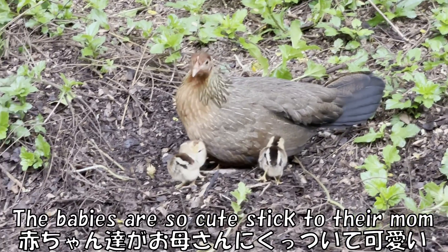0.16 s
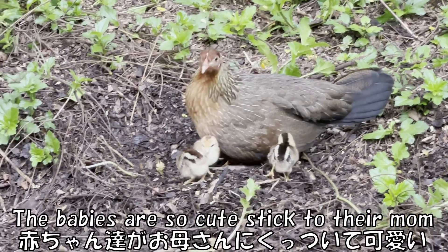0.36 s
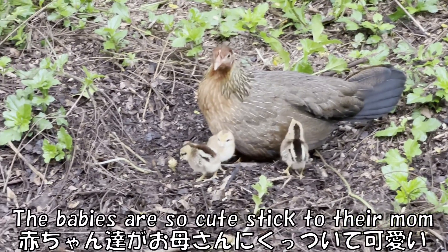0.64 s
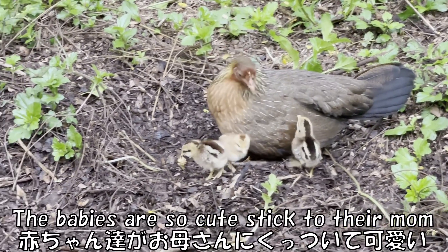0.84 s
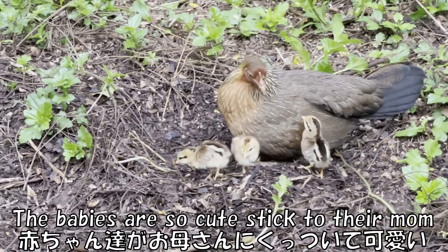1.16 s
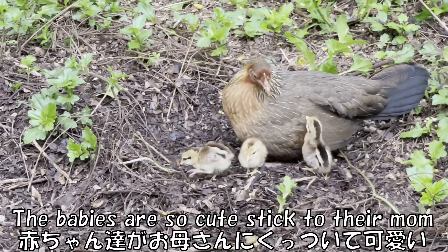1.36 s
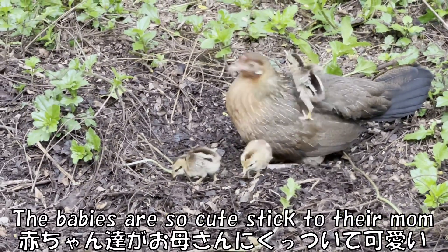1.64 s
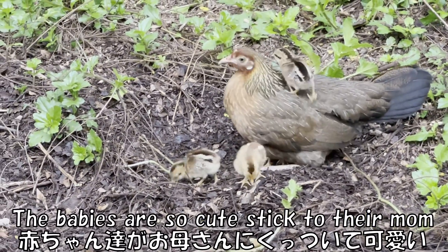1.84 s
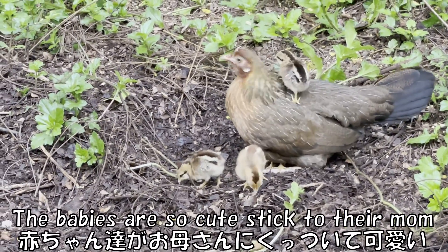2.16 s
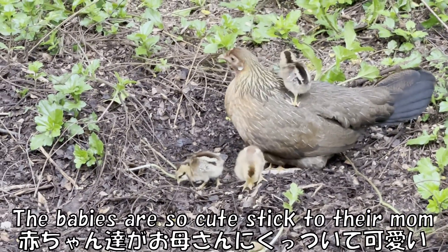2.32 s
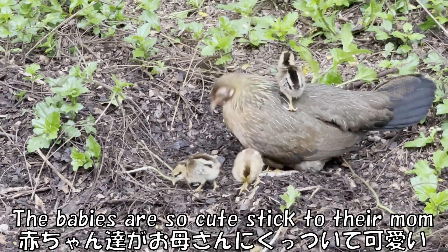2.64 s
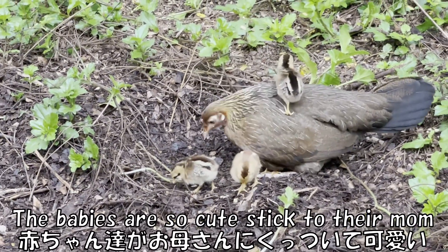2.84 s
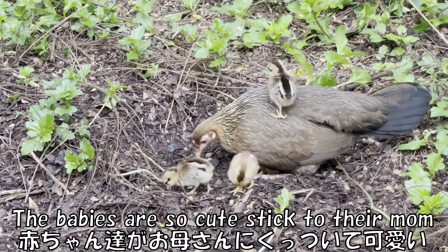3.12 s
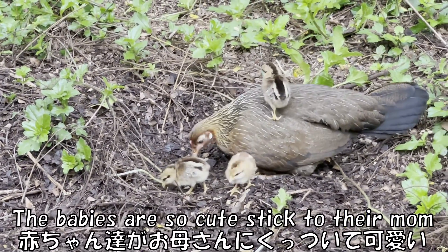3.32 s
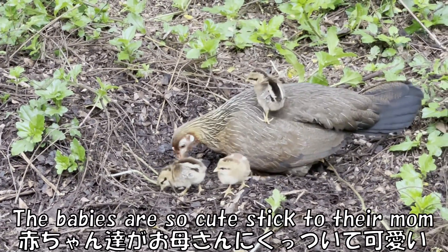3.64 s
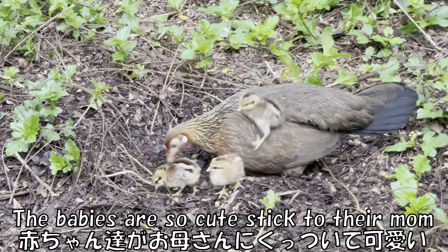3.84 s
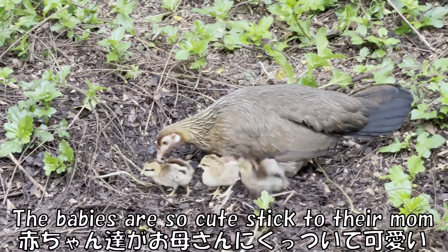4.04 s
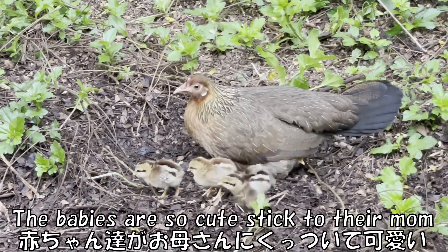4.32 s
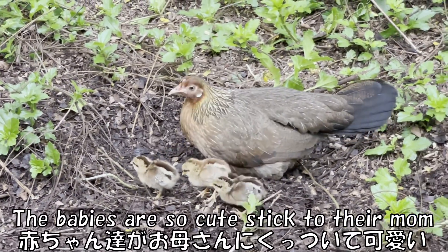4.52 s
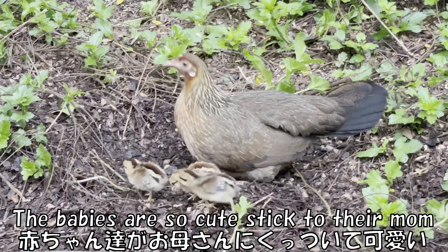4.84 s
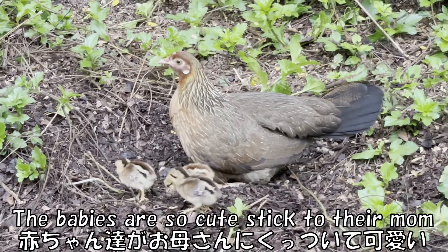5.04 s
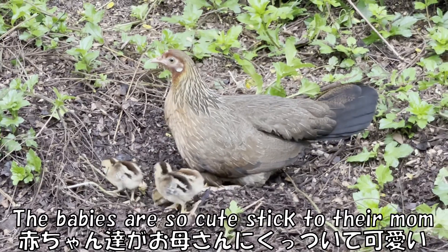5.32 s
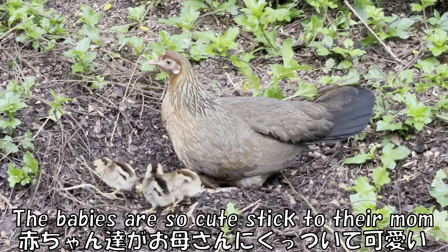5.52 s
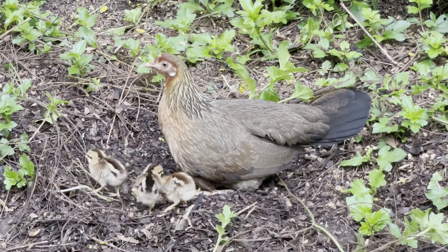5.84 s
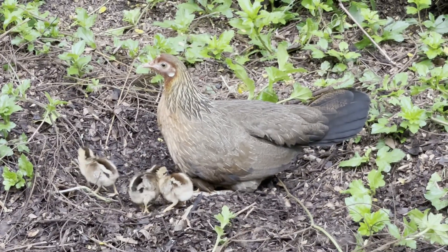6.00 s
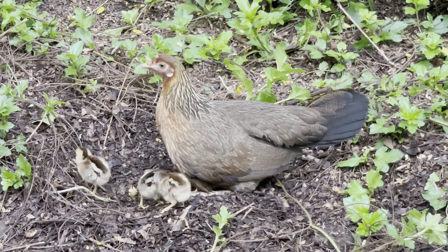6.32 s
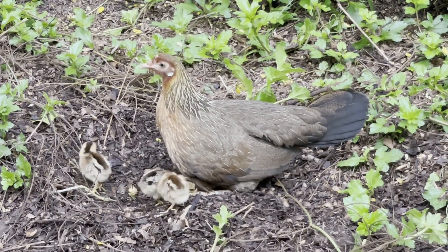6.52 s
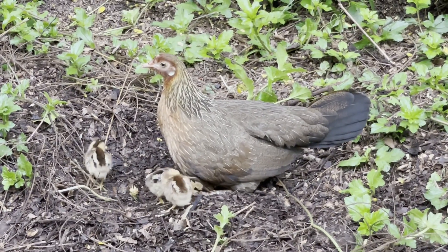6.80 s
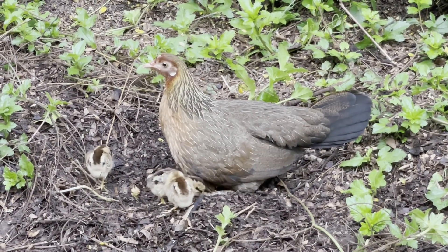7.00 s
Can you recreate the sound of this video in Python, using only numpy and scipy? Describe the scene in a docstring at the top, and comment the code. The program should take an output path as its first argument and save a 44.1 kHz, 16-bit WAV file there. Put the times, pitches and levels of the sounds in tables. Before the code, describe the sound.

For about seven seconds, a wide bed of distant traffic rumble, soft tyre wash, faint machine hum and thin hiss continues, with bass engine drones swelling most around 3.3 and 4.3-5.2 seconds. High, quiet crickets trill and buzz throughout; one stutters rapidly until about 3.8, while another gives brief chirps from 3 onward. Thin, nearly pure chick peeps start at once, cluster at 0.4-2.0, pause, then return at 3.0-5.3 and 6.1-7.0. At 0.6-1.1 a clearer songbird whistles four low, fluty notes, the last sliding down with a rough edge, followed by wall echo and leafy reverberation. Small scuffs and steps rustle dry litter at 1.8-2.2. Far hoarse bird chips fall at 2.4-2.8, then more strongly at 6.3-6.8, beside tiny twig ticks at 6.3 and 6.5.

```python
"""Chicks in a green city corner

Chicks peep as gliding near-pure tones and scuff dry litter in decaying bursts of grainy noise.
A wild bird whistles one phrase that a wall throws back; another calls from far off by way of the trees.
Crickets trill, buzz, stutter and chirp in the weeds: tones and narrow noise pulsed by wing beats.
Behind them lie far engines as wandering bass tones, and rumble, wash, hum, whine and hiss as shaped noise.
"""
import sys
import numpy as np
from scipy import signal
from scipy.fft import rfft, irfft
from scipy.io import wavfile
from scipy.ndimage import uniform_filter1d

SR = 44100
rng = np.random.default_rng(int(sys.argv[2]) if len(sys.argv) > 2 else 0)


def to_wav(s):
    """Save 16-bit WAV."""
    ch = np.atleast_2d(s).T  # columns
    pcm = np.round(np.clip(ch, -1, 1) * 32767)  # PCM
    wavfile.write(sys.argv[1], SR, pcm.astype(np.int16))


N = 315756
TIME = np.arange(N) / SR
BINS_HZ = np.maximum(np.arange(N // 2 + 1) * SR / N, 1)
TOP_HZ = 15700

# Spectrum of the traffic rumble. Each row: frequency in Hz, relative density in dB per Hz.
RUMBLE_SPECTRUM = [(20, -13), (32, -14), (41, -30), (50, -5), (66, 0), (88, 2.5), (108, -4.5), (135, -8.5),
                   (170, -9), (215, -17), (245, -21.5)]
# Spectrum of the wider city wash. Each row: frequency in Hz, relative density in dB per Hz.
WASH_SPECTRUM = [(140, -61), (240, -1), (412, -2.5), (489, -1), (612, -7.5), (645, -8), (698, -10.5),
                 (765, -9.5), (1520, -18), (1830, -14), (2260, -21), (3010, -25.5), (3980, -30.5),
                 (4780, -33.5), (5600, -35.5), (7280, -88), (12300, -120)]
# Spectrum of the thin hiss of the air. Each row: frequency in Hz, relative density in dB per Hz.
AIR_SPECTRUM = [(4800, -12), (5700, 7), (7400, 12.5), (8600, -73), (10300, 4.5), (11200, 6), (12400, 7),
                (13500, 1), (15500, -4)]
# Stereo width of the background. Each row: frequency in Hz, side minus mid in dB.
STEREO_WIDTH = [(40, -19), (85, -19), (160, -7.5), (280, -10), (490, -3), (700, 0.5), (1100, 0),
                (1800, -15.5), (4000, -7), (8000, -10), (12000, -13)]
# Hum of far machinery. Each row: frequency in Hz, level in dB.
HUM_BANDS = [(188, -53.5), (220, -58), (281, -61), (493, -58.5), (659, -62.5)]
# Faint thin whine high in the air. Each row: frequency in Hz, level in dB.
WHINE_BANDS = [(7584, -85), (9930, -81), (11810, -86)]
# Course of the heavy far engine. Each row: time in seconds, level in dB before heavy_db and the sway.
HEAVY_ENGINE_LEVEL = [(0, -42), (0.9, -56), (1.35, -49), (1.75, -49), (2.85, -63), (3.25, -38), (3.6, -49),
                      (4.3, -34), (4.75, -41), (5.15, -35.5), (5.65, -51), (6.7, -53), (7.05, -42)]

# Tones of the steady trill. Each row: wing beats away from the tooth tone, peak level in dB before the gain.
TRILL_TONES = [(-2, -86), (-1, -71), (0, -73), (1, -73), (2, -85)]
TRILL_HZ, TRILL_BEAT_HZ = 8023, 56

# Buzzing cricket: pace of its pushes; ring level in a push and between pushes
PUSH_ENDS_S, PUSH_EVERY_S, PUSH_LENGTH_S, PUSH_SWELL_S, PUSH_RELEASE_S = 0.542, 1.143, 0.63, 0.42, 0.043
PUSH_RING_DB, REST_RING_DB = -64, -76.5

# Stuttering cricket: one bout of even bursts
STUTTER_FROM_S, STUTTER_UNTIL_S, STUTTER_EVERY_S, STUTTER_LENGTH_S = 0.073, 3.76, .1625, 0.14
# Level at the bout's edges, mid-bout swell, random spread of level and timing
STUTTER_DB, STUTTER_SWELL_DB, STUTTER_SPREAD_DB, STUTTER_JITTER_S = -70, 4.5, 0.1, 0.011
# Short chirps of a second cricket. Each row: start in seconds, level in dB.
CHIRP_EVENTS = [(3.035, -64), (3.525, -65), (4.21, -65), (4.71, -66), (5.158, -61), (5.68, -63.5),
                (6.268, -63), (6.962, -61)]
CHIRP_LENGTH_S = 0.044

# Calls of the far bird. Each row: start in seconds, length in seconds, start pitch in Hz, end pitch in Hz,
# arch above a straight glide in Hz, level in dB before the direct and scattered gains.
FAR_BIRD_CALLS = [(2.385, .128, 3560, 2940, 151, -67), (2.515, 0.05, 2980, 2490, -20, -60),
                  (2.755, .084, 2930, 2380, -41, -62), (6.337, .035, 3040, 2420, -40, -57),
                  (6.493, 0.04, 3070, 2420, -140, -52), (6.74, .036, 3100, 2370, -130, -52.5)]

# Notes of the whistled phrase. Each row: start in seconds, length in seconds, attack in seconds, top in Hz,
# end in Hz, scoop up from below in Hz, direct level in dB before the shake.
WHISTLE_NOTES = [(.626, .054, 0.022, 1810, 1628, 0, -42.5), (.778, 0.05, 0.014, 1769, 1720, 2, -38),
                 (.866, .088, 0.018, 1708, 1215, 3, -42.5), (1.022, 0.11, 0.0088, 1610, 1458, 904, -43.5)]
# Overtones of the whistle. Each row: multiple of the pitch, level in dB before slide, edge and fizz gains.
WHISTLE_OVERTONES = [(4, -41), (5, -31), (6, -42), (7, -38), (8, -26.5), (9, -37), (10, -41)]
WHISTLE_RELEASE_S, SCOOP_TAU_S = .015, .008
# A soft tone links the notes and breaks off before the last one
LINK_FADE_S, LINK_DB, BREAK_S = 0.045, -53.5, .05

# Scuffs, steps and twig ticks of small feet and wings. Each row: start in seconds, decay in seconds,
# centre in Hz, nominal width in Hz, level in dB before the envelope.
LITTER_SCUFFS = [(1.812, 0.053, 7800, 4200, -52), (1.936, 0.11, 2300, 1900, -53),
                 (1.978, 0.022, 1500, 1300, -47), (2.217, 0.011, 990, 990, -39),
                 (5.915, .015, 8000, 9000, -66), (6.304, 0.0056, 3500, 450, -43),
                 (6.468, .006, 4150, 600, -48)]

# Chick peeps. Each row: start in seconds, length in seconds, start pitch in Hz, end pitch in Hz,
# arch above a straight glide in Hz, direct level in dB.
CHICK_PEEPS = [(.065, 0.1, 4850, 3720, 20, -64.5), (.44, 0.091, 4700, 3750, -88, -63),
               (.605, 0.022, 3800, 3340, 50, -61.5), (.65, .054, 3950, 3450, 70, -63),
               (.72, 0.077, 4400, 3800, 370, -64), (1.1, .065, 4060, 3550, 12, -57.5),
               (1.215, .045, 3250, 3880, -90, -63), (1.26, 0.054, 4310, 3580, 160, -57.5),
               (1.392, .038, 3070, 3960, -90, -63), (1.62, 0.032, 3100, 4030, -280, -59),
               (1.675, .075, 4080, 3620, 140, -55.5), (1.895, 0.078, 4300, 3780, 142, -60),
               (2.965, .05, 3850, 3300, 40, -67), (3.11, 0.04, 4170, 3600, 120, -66),
               (3.6, 0.043, 3780, 3640, 0, -60.5), (3.63, .071, 4400, 3630, 170, -67),
               (3.732, .044, 4200, 3620, 80, -57.5), (3.805, 0.085, 4420, 3900, 300, -65),
               (4.14, .047, 4150, 3460, 0, -56.5), (4.205, .075, 4580, 3700, 80, -61.5),
               (4.29, .05, 4200, 3630, 100, -56.5), (4.642, 0.052, 4080, 3630, 62, -59),
               (4.828, .057, 4180, 3680, 100, -61), (5.25, .03, 3850, 3480, 20, -61),
               (5.26, 0.05, 4080, 3650, 60, -66), (6.088, 0.061, 3830, 3480, 190, -61.5),
               (6.265, .046, 4150, 4020, 210, -66), (6.665, .075, 4700, 4100, 130, -65),
               (6.975, .084, 4750, 3800, 240, -63.5)]


def undb(db):
    """Decibels to gain."""
    return 10 ** (np.asarray(db) / 20)


def unit(x):
    """Scale to an rms of one."""
    return x / np.sqrt(np.mean(x ** 2) + 1e-20)


def colour(points):
    """Gain at every frequency from (Hz, dB) points, falling steeply outside them."""
    hz, db = np.transpose(points)
    outside = np.minimum(BINS_HZ / hz[0], 1) * np.minimum(hz[-1] / BINS_HZ, 1)
    return undb(np.interp(np.log(BINS_HZ), np.log(hz), db)) * outside ** 10


def noise(gain):
    """Unit-rms noise with the given gain at every frequency."""
    return unit(irfft(rfft(rng.standard_normal(N)) * gain, N))


def band(hz, width_hz):
    """Unit-rms noise in one steep resonance, 4.5 dB down at 0.8 width_hz to either side."""
    return noise(1 / (1 + ((BINS_HZ - hz) / (.8 * width_hz)) ** 4) ** .75)


def walk(rate_hz):
    """Smooth random wander of unit rms; its spectrum decays exponentially over rate_hz."""
    return noise(np.exp(-np.arange(len(BINS_HZ)) * SR / N / rate_hz))


def diffuse(gain):
    """Noise from all around: mid and side noise, with the side share set by frequency."""
    hz, side_db = np.transpose(STEREO_WIDTH)
    width = undb(np.interp(np.log(BINS_HZ), np.log(hz), side_db))
    share = np.sqrt(np.sum((gain * width) ** 2) / np.sum(gain ** 2))
    return noise(gain) + np.array([[1], [-1]]) * share * noise(gain * width)


def add(out, start_s, sound):
    """Mix a sound in at its start time."""
    i = max(int(start_s * SR), 0)
    out[i:i + len(sound)] += sound[:max(N - i, 0)]


def gate(age_s, length_s, attack_s, release_s):
    """Linear rise, hold and fade over the life of a note."""
    return np.clip(np.minimum(age_s / attack_s, (length_s - age_s) / release_s), 0, 1)


def notes(table, waver):
    """Gliding notes: the pitch arches from start to end, the level swells and fades."""
    out = np.zeros(N)
    drift = 1 + waver * walk(230)
    for start_s, length_s, start_hz, end_hz, arch_hz, db in table:
        u = np.linspace(0, 1, max(int(length_s * SR), 8))
        bow = np.abs(np.sin(np.pi * u))
        glide_hz = start_hz + (end_hz - start_hz) * u + arch_hz * bow
        hz = glide_hz * np.roll(drift, -int(start_s * SR))[:len(u)]
        add(out, start_s, undb(db) * np.sqrt(2 * bow) * np.sin(2 * np.pi * np.cumsum(hz) / SR))
    return out


def scatter(x, t60_s, spread):
    """Trees and house fronts scatter a sound into a short diffuse tail."""
    t = TIME[:SR]
    decay = np.exp(-np.log(1000) * t / t60_s) * (1 - np.exp(-t / 0.0044))
    mid, side = rng.standard_normal((2, SR)) * decay
    tails = (mid + spread * side * np.array([[1], [-1]])) / np.sqrt(np.sum(mid ** 2))
    return signal.fftconvolve(x[None], tails, axes=1)[:, :N]


def drone(hz, db, wander, sway_db):
    """A far engine of which only the firing tone carries; its speed and level wander."""
    phase = 2 * np.pi * np.cumsum(hz * (1 + wander * walk(1.9))) / SR
    return np.sqrt(2) * undb(db + sway_db * walk(3.3)) * np.sin(phase)


def engines(heavy_db=2.0, idling_db=-43.0):
    """A heavy engine swells and sinks beside an idling one, each a single bass tone."""
    heavy_level_db = heavy_db + np.interp(TIME, *np.transpose(HEAVY_ENGINE_LEVEL))
    heavy = drone(46.5, heavy_level_db, wander=0.014, sway_db=-2)
    return heavy + drone(55, idling_db, wander=0.02454, sway_db=4.0)


def rumble(level_db=-36, swell_db=0.8):
    """Distant traffic: diffuse bass noise with a slow random swell."""
    return diffuse(colour(RUMBLE_SPECTRUM)) * undb(level_db + swell_db * walk(0.36))


def wash(level_db=-45, flutter_db=0.5, left_db=2, lead_rad=0.76):
    """Diffuse city noise, with the tyre noise of the nearest road leaning to the left."""
    sound = diffuse(colour(WASH_SPECTRUM)) * undb(level_db + flutter_db * walk(4.3))
    # around 560 Hz the left ear hears it louder and sooner
    lean = np.outer([.5, -.5], np.exp(-np.log(BINS_HZ / 560) ** 2 / 1.34))
    return irfft(rfft(sound) * undb(left_db * lean) * np.exp(1j * lead_rad * lean), N)


def machinery():
    """Far machines hum in narrow noise bands."""
    return sum(undb(db) * band(hz, 8.7) for hz, db in HUM_BANDS)


def whine():
    """A thin whine: very narrow noise bands in the treble."""
    return sum(undb(db) * band(hz, 5.7) for hz, db in WHINE_BANDS)


def air(level_db=-69.5):
    """Thin diffuse treble hiss."""
    return undb(level_db) * diffuse(colour(AIR_SPECTRUM))


def city():
    """Engines drone in the bass under an even wash of tyres, machinery and air."""
    return engines() + rumble() + wash() + machinery() + whine() + air()


def triller(rasp_db=-76, sweep_rad=0.81, gain=1.25, flicker_db=1.73):
    """A cricket holds one thin tone, pulsed by its wing beat, over a little rasp."""
    clock_s = np.cumsum(1 + .0001 * walk(3)) / SR
    # each stroke sweeps a little in pitch, which spreads it over the beat and softens the pulsing
    tone = sum(undb(db) * np.sin(2 * np.pi * (TRILL_HZ + k * TRILL_BEAT_HZ) * clock_s + sweep_rad * k ** 2)
               for k, db in TRILL_TONES)
    rasp = unit(band(8100, 300) * (1 + np.cos(np.pi * TRILL_BEAT_HZ * clock_s) ** 2))
    return gain * tone * undb(flicker_db * walk(51)) + undb(rasp_db) * rasp


def buzzer(beat_hz=86, body_db=-65.5, rest=1.0):
    """A ground cricket buzzes evenly; about once a second it pushes and its narrow top resonance rings."""
    age_s = (TIME - PUSH_ENDS_S + PUSH_LENGTH_S) % PUSH_EVERY_S
    push = gate(age_s, PUSH_LENGTH_S, PUSH_SWELL_S, PUSH_RELEASE_S)
    ring_db = REST_RING_DB + (PUSH_RING_DB - REST_RING_DB) * push
    beat = np.cumsum(beat_hz * (1 + 0.01 * walk(2.8))) / SR
    wings = unit(rest + np.sin(np.pi * beat) ** 2)
    return wings * (undb(body_db) * band(9430, 740) + undb(ring_db) * band(9710, 180))


def strokes(table, beat_hz, tooth_hz, glide, rasp, jitter, uneven_db=2):
    """Bursts of wing strokes; in each the scraper speeds up along the file, so the tone rises."""
    beat = np.cumsum(beat_hz * (1 + jitter * walk(28))) / SR % 1
    hz = tooth_hz * (1 + glide * (beat - .5) + rasp * walk(870))
    tone = np.sin(2 * np.pi * np.cumsum(hz) / SR)
    song = unit(np.sin(np.pi * beat) ** 2 * tone * undb(uneven_db * walk(50)))
    effort = np.zeros(N)
    for start_s, length_s, db in table:
        add(effort, start_s, undb(db) * signal.windows.tukey(max(int(length_s * SR), 8), .25))
    return song * effort


def crickets(wet_db=-9):
    """Two singers in the weeds: one stutters through a bout and stops, the other gives short chirps."""
    starts_s = np.arange(STUTTER_FROM_S, STUTTER_UNTIL_S, STUTTER_EVERY_S)
    late, loud = rng.standard_normal((len(starts_s), 2)).T
    swell_db = STUTTER_SWELL_DB * np.sin(np.pi * starts_s / STUTTER_UNTIL_S)
    levels_db = STUTTER_DB + swell_db + STUTTER_SPREAD_DB * loud
    bout = [(s, STUTTER_LENGTH_S, db) for s, db in zip(starts_s + STUTTER_JITTER_S * late, levels_db)]
    stutter = strokes(bout, beat_hz=76.9, tooth_hz=6670, glide=0.118, rasp=0.02, jitter=0.0674)
    short = [(s, CHIRP_LENGTH_S, db) for s, db in CHIRP_EVENTS]
    chirps = strokes(short, beat_hz=81.2, tooth_hz=6740, glide=0.036, rasp=0.0165, jitter=0.019)
    return stutter + chirps + undb(wet_db) * scatter(stutter + chirps, t60_s=0.41, spread=1.0)


def far_bird(direct_db=-1, wet_db=1):
    """Slightly hoarse falling chips, much of them heard by way of the trees."""
    voice = notes(FAR_BIRD_CALLS, waver=.014)
    return undb(direct_db) * voice + undb(wet_db) * scatter(voice, t60_s=0.7, spread=.3)


def phrase():
    """Pitch and strength of the whistle: notes slide down S-curves from their tops, linked by a soft tone."""
    first_s, last_s = WHISTLE_NOTES[0][0] - LINK_FADE_S, WHISTLE_NOTES[-1][0] - BREAK_S
    # nothing is heard before the first note; the link then holds each note's end pitch
    pitch_hz = np.zeros(N)
    strength = undb(LINK_DB) * gate(TIME - first_s, last_s - first_s, LINK_FADE_S, LINK_FADE_S)
    for start_s, length_s, attack_s, top_hz, end_hz, scoop_hz, db in WHISTLE_NOTES:
        age_s = np.maximum(TIME - start_s, 0)
        sag_hz = (top_hz - end_hz) * np.sin(np.pi / 2 * np.minimum(age_s / length_s, 1)) ** 2
        note_hz = top_hz - sag_hz - scoop_hz * np.exp(-age_s / SCOOP_TAU_S)
        pitch_hz = np.where(age_s > 0, note_hz, pitch_hz)
        strength = np.maximum(strength, undb(db) * gate(age_s, length_s, attack_s, WHISTLE_RELEASE_S))
    return pitch_hz, strength


def songbird(echo_s=.056, echo_db=2, wet_db=-9, waver=0.0078,
             fizz_db=-1.5, edge_db=-7, slide_db=10, shake_db=1.5):
    """A fluty phrase from a perch; a wall returns it loud and without overtones, and the trees ring on."""
    pitch_hz, strength = phrase()
    phase = 2 * np.pi * np.cumsum(pitch_hz * (1 + waver * walk(94))) / SR
    effort = np.sqrt(2) * strength * undb(shake_db * walk(93))
    flute = effort * np.sin(phase)
    both = flute + undb(echo_db) * np.interp(TIME - echo_s, TIME, flute)
    # the voice turns harsher on a fast downward slide, fully at 9000 Hz per second
    slide = uniform_filter1d(np.clip(-np.gradient(pitch_hz) * SR / 9000, 0, 1), SR // 100)
    overtones = sum(undb(db) * np.sin(round(k) * phase) for k, db in WHISTLE_OVERTONES)
    edge = effort * undb(slide_db * slide) * overtones
    # the faint overtones reach the ear mostly as a fizz scattered by leaves
    fizz = undb(edge_db) * edge + undb(fizz_db) * scatter(edge, t60_s=0.19, spread=0.063)
    return both + fizz + undb(wet_db) * scatter(both, t60_s=0.46, spread=0.49)


def litter(grain_db=4.5):
    """Each scuff is a quick cluster of dry crackles that dies away."""
    out = np.zeros(N)
    for start_s, decay_s, hz, width_hz, db in LITTER_SCUFFS:
        age_s = np.maximum(TIME - start_s, 0)
        envelope = (1 - np.exp(-age_s / 0.00074)) * np.exp(-age_s / decay_s)
        crackle = unit(band(hz, width_hz) * undb(grain_db * walk(250)))
        out += undb(db) * envelope * crackle
    return out


def chicks(wet_db=-11):
    """Soft, nearly pure peeps close to the ground."""
    voice = notes(CHICK_PEEPS, waver=0.0076)
    return voice + undb(wet_db) * scatter(voice, t60_s=0.32, spread=0.66)


def scene():
    """The small lives near the middle, the city all around."""
    return city() + triller() + buzzer() + crickets() + far_bird() + songbird() + litter() + chicks()


def record(dry):
    """A steep elliptic low-pass cuts the very top."""
    return signal.sosfilt(signal.ellip(10, .2, 80, TOP_HZ, fs=SR, output="sos"), dry)


dry = scene()
out = record(dry)
to_wav(out)
```